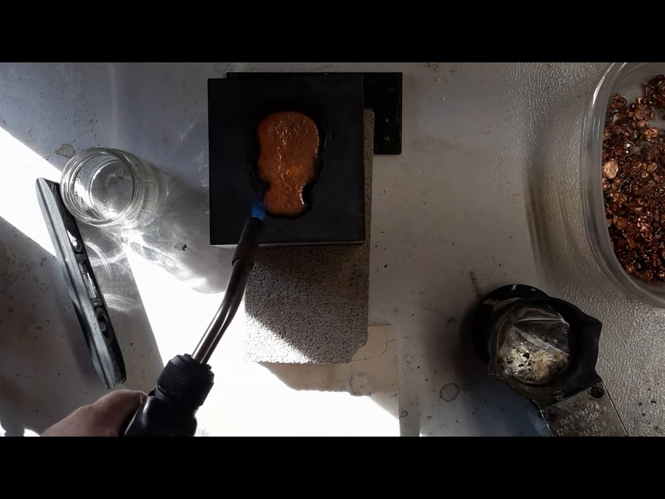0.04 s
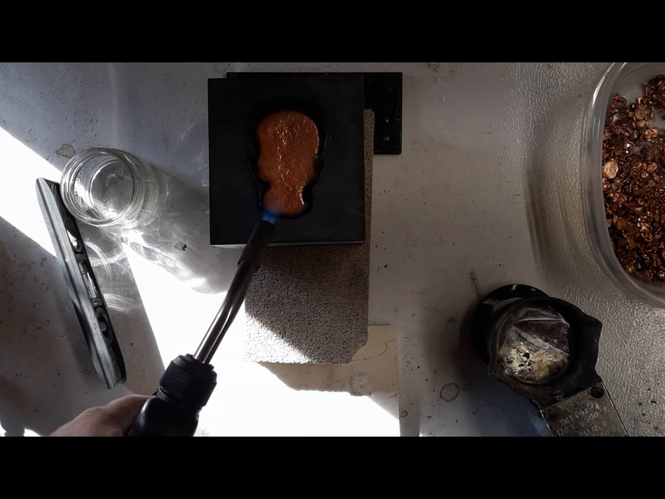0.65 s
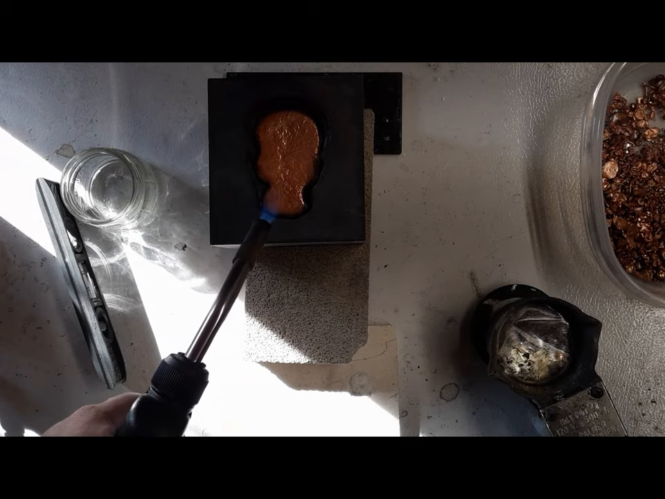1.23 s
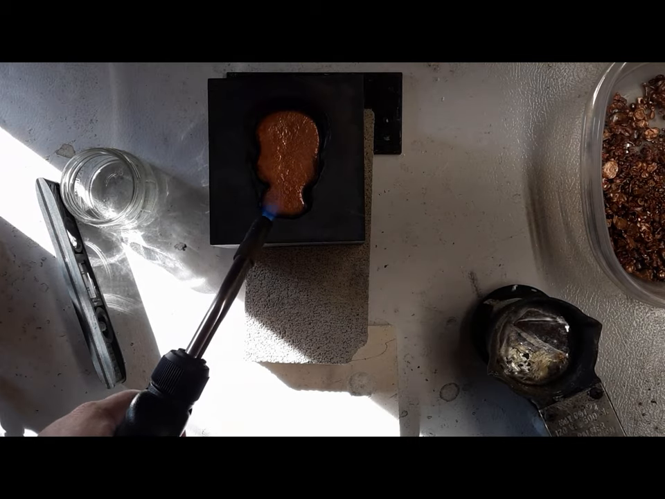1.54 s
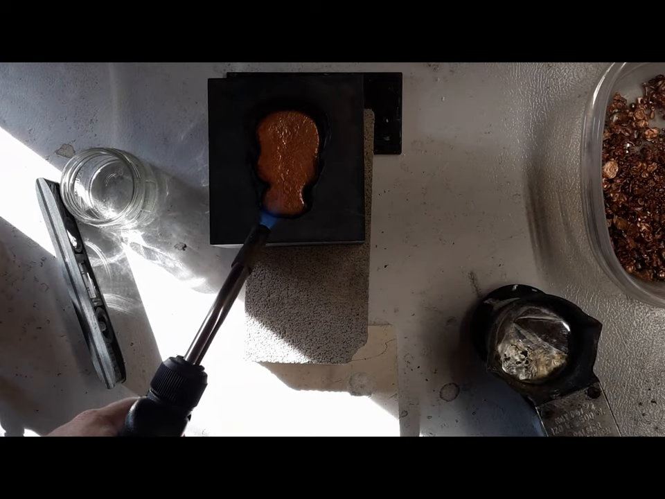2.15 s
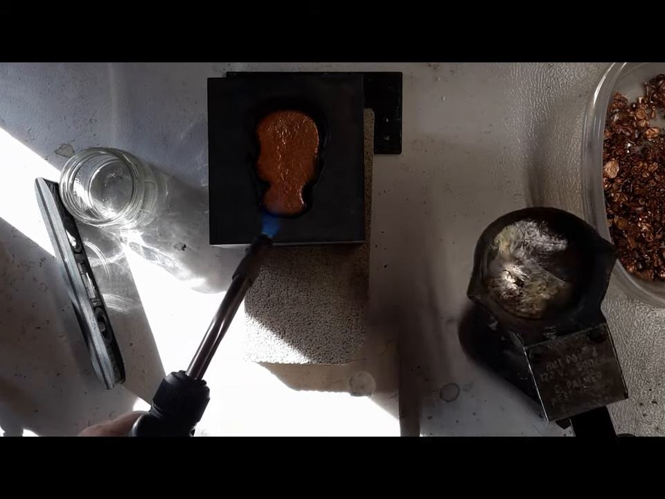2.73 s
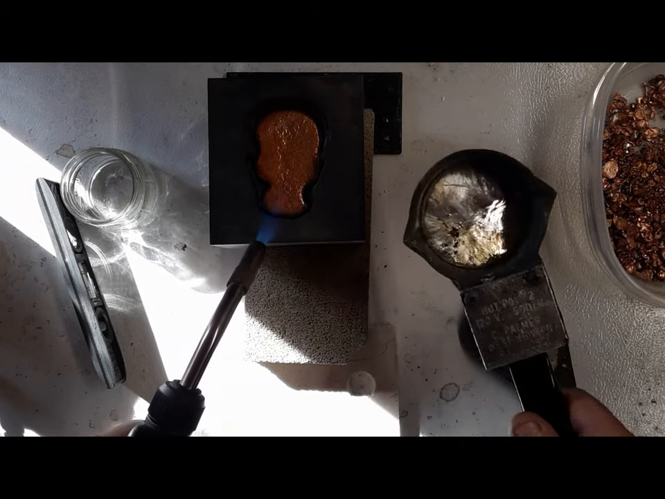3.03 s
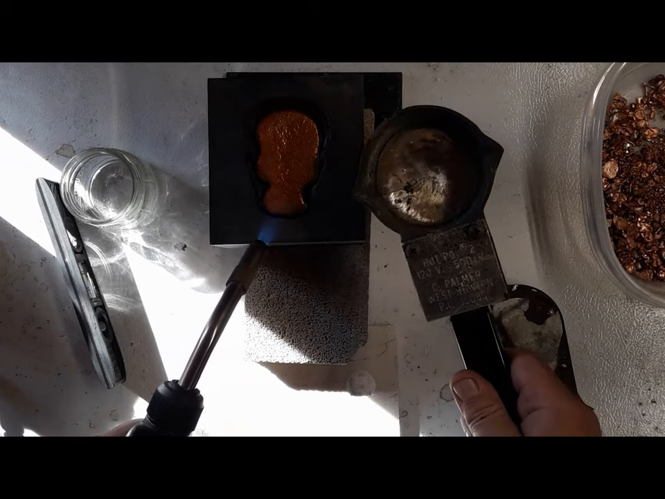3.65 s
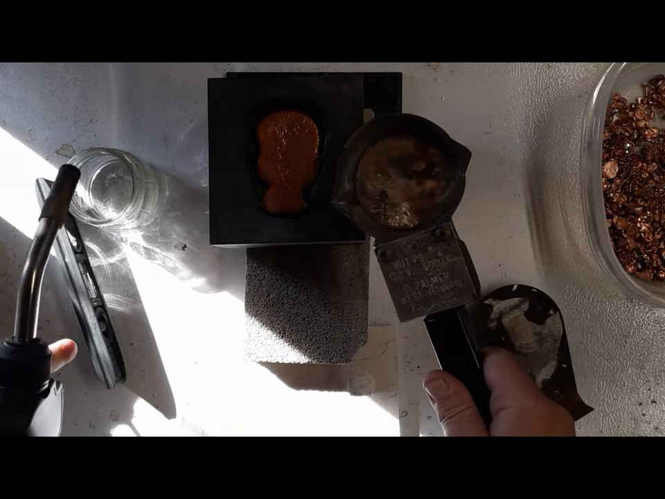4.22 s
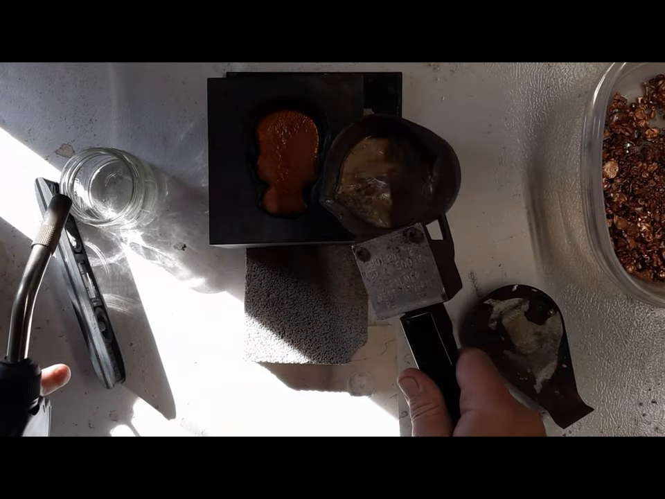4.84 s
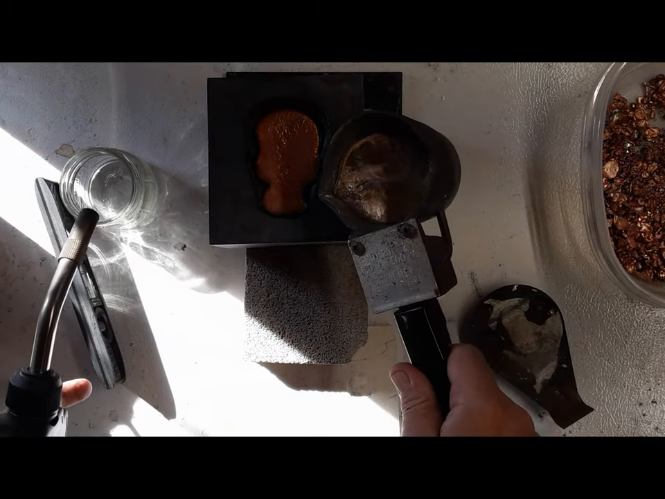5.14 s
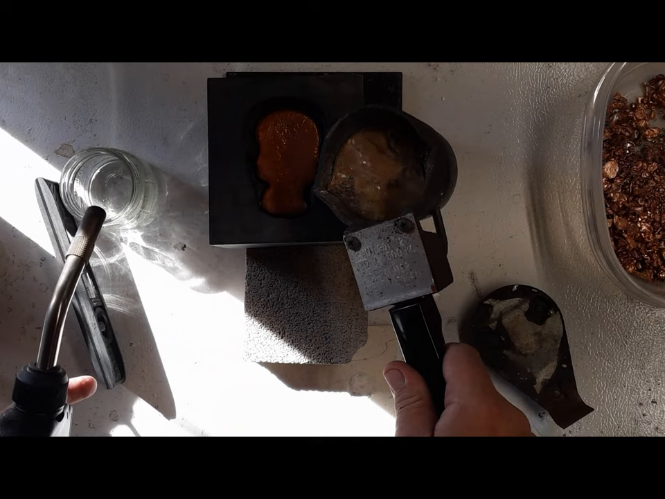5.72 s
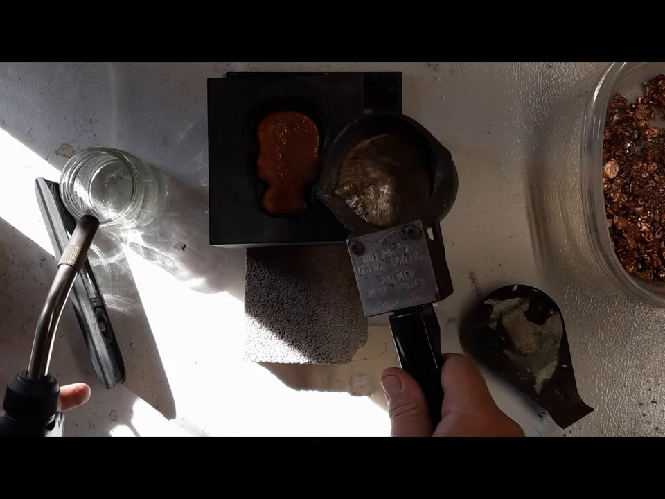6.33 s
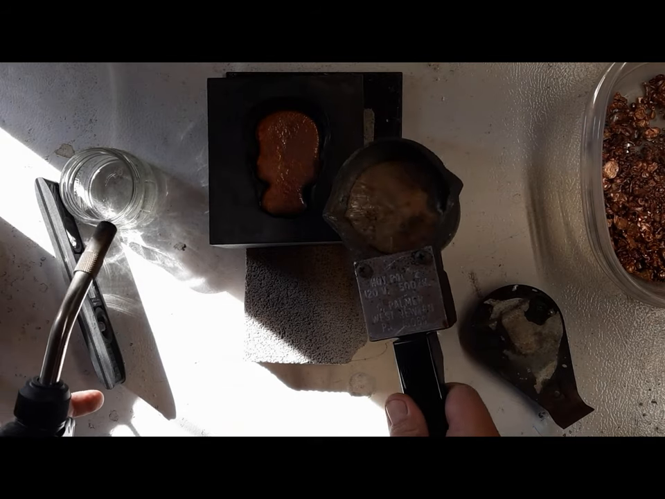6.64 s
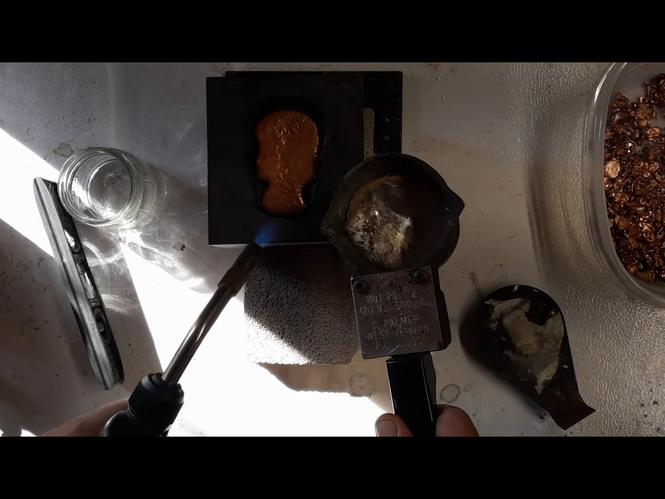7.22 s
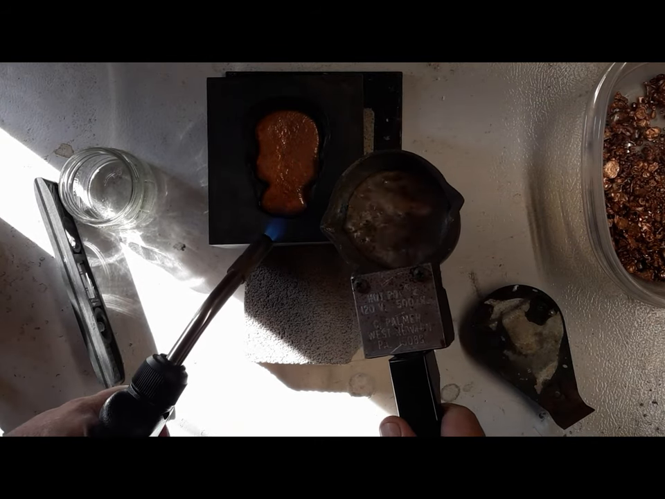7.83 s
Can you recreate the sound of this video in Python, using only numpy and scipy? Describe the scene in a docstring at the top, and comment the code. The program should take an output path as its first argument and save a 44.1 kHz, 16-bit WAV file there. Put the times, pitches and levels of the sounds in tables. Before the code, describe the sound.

Close to the microphone at a workbench, a gas torch flame gives a low roar with a raspy hiss on top. It cuts off after four seconds. A quiet pause holds only soft room noise, a faint hum and slight tool ticks. Then comes a short rush of gas and a sharp metallic igniter click, and the hissing flame returns with a small puff.

```python
"""At a workbench, a hand-held gas torch burns over a mould, is shut off, and is relit three seconds later.
Turbulence makes the flame roar and the gas jet hiss; reflections from the bench and the things on it
colour both by interference. In the pause a machine hums, air moves and handled tools click. Then the
trigger lets cold gas out, the piezo igniter snaps, and the flame catches with a low puff."""
import sys
import numpy as np
from scipy import signal
from scipy.fft import rfft, irfft
from scipy.io import wavfile

SR = 44100
rng = np.random.default_rng(int(sys.argv[2]) if len(sys.argv) > 2 else 0)


def transcribe(u):
    """Save the signal u as a 16-bit wav file named by the first command-line argument.

    u: samples, shape (n,) or (channels, n), limited to [-1, 1]; the rate is SR.
    q: integer samples, one column per channel.
    """
    v = np.clip(np.atleast_2d(u).T, -1, 1)
    q = np.round(v * 32767).astype(np.int16)
    wavfile.write(sys.argv[1], SR, q)


N = 356310
T = np.arange(N) / SR
SHUT_S, GAS_S, LIT_S = 4.052, 7.11, 7.1985  # valve shuts, valve opens, spark
FRAME_SIZE = 4096
HZ = np.fft.rfftfreq(FRAME_SIZE, 1 / SR)
FRAME_S = np.arange(N * 4 // FRAME_SIZE + 3) * FRAME_SIZE / 4 / SR


def gain_of(db):
    """Amplitude ratio of a level in decibels."""
    return 10 ** (np.asarray(db) / 20)


def unit_rms(x):
    """A signal normalised to rms 1."""
    return x / np.sqrt(np.mean(x ** 2) + 1e-20)


def curve(points):
    """Interpolation of (frequency, value) points on a log-frequency axis."""
    hz, value = np.transpose(points)
    return np.interp(np.log(HZ + 1), np.log(hz + 1), value)


def bumps(modes, at=HZ):
    """Resonances and antiresonances as Gaussian peaks and dips, in dB."""
    return sum(db * np.exp(-.5 * ((at - hz) / width) ** 2) for hz, width, db in modes)


def bell(hz, octaves):
    """A Gaussian passband on a log-frequency axis."""
    return np.exp(-.5 * (np.log2((HZ + 1) / hz) / octaves) ** 2)


def sides(left_db):
    """Gain of each ear for an interaural level difference, left minus right."""
    return gain_of(np.array([.5, -.5])[:, None, None] * left_db)


def swell(peak_s, width_s):
    """A Gaussian envelope that peaks at 1."""
    return np.exp(-.5 * ((T - peak_s) / width_s) ** 2)


def rising(start_s, rise_s):
    """0 until the start, then an exponential approach to 1."""
    return 1 - np.exp(-np.maximum(T - start_s, 0) / rise_s)


def dying(start_s, t60):
    """1 until the start, then an exponential decay of 60 dB in t60 seconds."""
    return np.exp(-np.log(1000) * np.maximum(T - start_s, 0) / t60)


def wander(lo_hz, hi_hz):
    """Random motion of rms 1, roughly pink between two rates."""
    hz = np.fft.rfftfreq(N, 1 / SR)
    pink = rfft(rng.standard_normal(N)) * (hz > lo_hz) / np.sqrt(hz + lo_hz)
    return unit_rms(irfft(pink / (1 + (hz / hi_hz) ** 2), N))


def noise(magnitude, coherence, lag_s=0):
    """Stereo noise of rms 1 with a given spectral shape, interaural coherence and right-ear lag."""
    a, b, c, d = rng.standard_normal((4, len(FRAME_S), len(HZ)))
    left, independent = a + 1j * b, c + 1j * d
    right = coherence * left * np.exp(-2j * np.pi * HZ * lag_s)
    right += np.sqrt(1 - coherence ** 2) * independent
    spectra = (np.array([left, right]) * magnitude).swapaxes(1, 2)
    _, wave = signal.istft(spectra, nperseg=FRAME_SIZE, noverlap=FRAME_SIZE * 3 // 4)
    return unit_rms(wave[:, :N])


def band(x, lo_hz, hi_hz):
    """A steep band-pass filter with its output at rms 1."""
    hz = np.fft.rfftfreq(N, 1 / SR)
    attenuation = np.sqrt((1 + (lo_hz / (hz + 1)) ** 20) * (1 + (hz / hi_hz) ** 20))
    return unit_rms(irfft(rfft(x) / attenuation, N))


def torch(roar_db=-25.5, jet_db=-33):
    """Turbulence radiates broadband noise: a low roar, a rasp and a jet hiss that fluctuate together."""
    # spectrum of the flame: frequency_hz, density_db
    spectrum = [(20, -58), (70, -32.5), (130, -13), (220, 2.5), (500, -14), (900, -3.5), (1400, -10),
                (2250, -15), (2550, -21), (5800, -21), (7600, -28.5), (10800, -31), (11900, -36.5),
                (15500, -36)]
    # resonances of the burner head: centre_hz, width_hz, gain_db
    burner_modes = [(159, 5.4, 3.5), (3670, 81, 3), (4720, 96, 2.5), (5850, 52, 3.5), (6910, 74, 2.5),
                    (7300, 100, -1.5), (11040, 130, 2.5)]
    # stereo balance of the flame: frequency_hz, left_minus_right_db
    balance = [(60, -0.5), (110, 0.5), (200, -4), (380, -2), (700, -0.5), (1290, -1), (2380, 0.5),
               (4400, -0.5), (8120, -1), (15000, -3.5)]
    # likeness of the flame at the two ears: frequency_hz, coherence
    coherence = [(60, 1), (130, 1), (290, 0.99), (640, 0.85), (1410, 0.8), (3100, 0.54), (6820, 0.45),
                 (15000, 0.088)]
    # the rasp as the flame plays over the mould: time_s, level_db
    rasp_levels = [(0.2, -26.5), (0.82, -28), (1.08, -26), (1.45, -29), (1.88, -26.3), (2.5, -27),
                   (3.2, -29), (3.75, -29.5), (3.97, -31.5)]
    colour = gain_of(curve(spectrum) + bumps(burner_modes) + nearby_objects())
    turbulence = noise(colour * bench() * sides(curve(balance)), curve(coherence))
    flutter, throb = wander(8.3, 150), wander(4.0, 24)
    flare_db = flaring()
    gasp = swell(4.05, 0.018)  # a last rasp as the valve closes
    rasp_db = np.interp(T, *np.transpose(rasp_levels))
    roar = band(turbulence, 22, 1113) * burning(roar_db, -29, overshoot_db=5.5, settle_s=0.24, t60=0.18)
    roar *= gain_of(flare_db + 0.15 * flutter + 0.64 * throb)
    rasp = band(turbulence, 1245, 3040)
    rasp *= burning(rasp_db, -30, overshoot_db=5.5, settle_s=0.082, t60=0.19)
    rasp *= gain_of(0.32 * flare_db + 4 * gasp + 0.15 * flutter + 0.76 * throb)
    jet = band(turbulence, 3220, 16500) * burning(jet_db, -37, overshoot_db=6, settle_s=0.21, t60=0.18)
    jet *= gain_of(0.14 * flare_db + gasp + 0.46 * flutter + 0.38 * throb)
    return roar + rasp + jet


def burning(first_db, relit_db, overshoot_db, settle_s, t60, catch_s=0.029):
    """Combustion envelope: the flame starves once shut off; relit, it overshoots and relaxes."""
    second_db = relit_db + overshoot_db * np.exp(-np.maximum(T - LIT_S, 0) / settle_s)
    alight = np.where(T < LIT_S, dying(SHUT_S, t60), rising(LIT_S, catch_s))
    return alight * gain_of(np.where(T < GAS_S, first_db, second_db))


def bench(dull_hz=9000, sway_s=1.2e-5, clutter=0.11, clutter_hz=2800, clutter_sway_s=3e-5, count=16):
    """Comb filtering: reflections interfere with the direct sound, and the combs slide as the hand sways."""
    # near reflections: delay_s, left_gain, right_gain
    echoes = [(0.0004, 0.34, 0.15), (0.00132, -0.36, 0.028), (0.00277, 0.06, 0.24), (0.00352, 0.39, 0.25),
              (0.00579, 0.05, 0.13), (0.00758, 0.1, 0.16)]
    # standing waves and cancellations over the bench: centre_hz, width_hz, gain_db
    bench_modes = [(77, 15, 8.5), (190.4, 7.6, -14), (247.7, 28, -9), (294.2, 5.5, 8), (338.6, 20.7, -9),
                   (376, 7.4, 6.5), (448, 12, -16), (524, 28.6, 7), (567, 7.8, -19), (640, 28, 5),
                   (763, 21, 5.5), (847, 16, 1.5), (933, 6.8, 4), (1022, 8.3, -11.5), (1046, 5.4, 3.5),
                   (1095, 13, -7.5), (1157, 6.6, -2), (1206, 16, -9.5), (1276, 13, -9), (1430, 18, -5),
                   (1533, 18, 4), (1584, 14, 6), (1830, 5.6, 5.5), (1950, 9.5, -11), (2073, 9, 4),
                   (3320, 53, -6), (4020, 39, -3.5), (4990, 34, -6), (5230, 69, -4.5)]
    hand = np.interp(FRAME_S, T, wander(.1, 0.62))[:, None]
    paths = np.ones((2, len(FRAME_S), len(HZ)), complex)  # ear, frame, frequency
    slide = np.exp(-2j * np.pi * HZ * sway_s * hand - HZ / dull_hz)
    for delay_s, left, right in echoes:
        paths += np.array([left, right])[:, None, None] * np.exp(-2j * np.pi * HZ * delay_s) * slide
    # small things scatter only short waves; the flame nears some and leaves others
    short_waves = HZ ** 2 / (HZ ** 2 + clutter_hz ** 2)
    for direction in (-1, 0, 1):
        delays_s = np.geomspace(.0014, .016, count)[:, None] * rng.uniform(.9, 1.1, (count, 1))
        ear_delays_s = delays_s + rng.uniform(-3e-5, 3e-5, (2, count, 1))
        polarity = rng.choice([-1, 1], (count, 1))
        scatter = (polarity * np.exp(-2j * np.pi * HZ * ear_delays_s)).sum(1)[:, None]
        motion = np.exp(-2j * np.pi * HZ * direction * clutter_sway_s * hand)
        paths += clutter * short_waves * scatter * motion
    return abs(paths) * gain_of(bumps(bench_modes))


def nearby_objects(ladle_s=(2.4, 3.3), swing_s=(3.67, 3.84), octaves_per_s=0.78, echo_s=0.0021):
    """Resonance and reflection near the flame colour it, in dB per frame and frequency."""
    # two resonances of the jet grazing the mould's edge: time_s, upper_db, lower_db
    jet_song = [(0, -1, -1), (.3, -4, 1.5), (.55, 1.5, 3), (.87, -0.5, -0.5), (1.15, 1, 0),
                (1.48, 5.5, -1.5), (1.9, -2.5, 2.5), (2.199, -1.5, -1.5), (2.55, -2.5, 1.5), (3.1, 2.5, -3)]
    # peaks and dips over the mould alone: centre_hz, width_hz, gain_db
    mould_modes = [(2315, 86, 3.5), (2580, 110, -6.5), (3030, 96, 4.5)]
    # peaks and dips with a ladle alongside: centre_hz, width_hz, gain_db
    ladle_modes = [(300, 16, 3), (916, 16, 4.5), (1800, 110, -4), (3900, 270, 2), (7300, 920, -2.5)]
    # a dip as the ladle passes closest: centre_hz, width_hz, gain_db
    ladle_hollow = [(3200, 260, -3.5)]
    # peaks and dips that slide down as the torch swings away: centre_hz, width_hz, gain_db
    swing_modes = [(1940, 220, -6), (2950, 89, -0.5), (3620, 190, 4.5), (4280, 220, 5.5), (5630, 160, 2),
                   (6880, 1000, -2.5)]
    # the second burn, held lower at the mould's edge: centre_hz, width_hz, gain_db
    low_hold_modes = [(225, 27, -1.5), (301, 14, 0.5), (659, 30, 0), (810, 31, -1.5), (1050, 15, 3),
                      (1102, 11, -1), (1260, 12, -4), (1290, 14, 9), (1360, 32, -1), (1840, 120, -2),
                      (2270, 55, 5), (2500, 39, -12), (3150, 95, 4), (3530, 51, -1), (4050, 60, -4),
                      (4530, 110, -6), (4850, 60, 3.5), (5080, 70, -4), (5380, 60, 3.5), (5750, 110, -7),
                      (8250, 130, 3)]
    t = FRAME_S[:, None]
    beside, away = np.interp(t, ladle_s, (0, 1)), np.interp(t, swing_s, (0, 1))
    times, upper_db, lower_db = np.transpose(jet_song)
    song = np.interp(t, times, upper_db) * bell(4530, 0.16)
    song += np.interp(t, times, lower_db) * bell(3110, 0.07)
    pipe = 0.56 * np.interp(t, T, flaring()) * bell(865, 0.09)  # flares drive a pipe-like resonance
    hollow = np.interp(t, T, swell(2.98, 0.2)) * bumps(ladle_hollow)
    surroundings = (1 - beside) * bumps(mould_modes) + beside * bumps(ladle_modes) + hollow
    sliding_hz = HZ * 2 ** (octaves_per_s * (t - swing_s[1]))
    comb = 0.5 * np.cos(2 * np.pi * sliding_hz * echo_s)  # a bench reflection lengthens with the swing
    swing = bumps(swing_modes, sliding_hz) + comb
    first_burn = (1 - away) * (song + pipe + surroundings) + away * swing
    return np.where(t < GAS_S, first_burn, bumps(low_hold_modes))


def flaring():
    """Amplitude modulation of the flame by brief flares and lulls, in dB."""
    # flares and lulls of the roar: peak_s, gain_db, width_s
    flares = [(0.191, 5, 0.01), (0.765, -3, 0.018), (1.23, 2, 0.26), (1.92, 1.5, 0.058),
              (2.957, 1.5, 0.044), (3.19, -2.5, 0.042), (3.305, 3, 0.025), (3.42, -1.5, 0.039),
              (3.608, 1.5, 0.085), (3.985, -2, 0.013), (4.032, 5.5, 0.0064), (7.265, 2.5, 0.015),
              (7.336, -3.5, 0.01)]
    return sum(db * swell(peak_s, width_s) for peak_s, db, width_s in flares)


def workshop(air_db=-51, waver_db=1.7, sizzle_rest_db=-81):
    """Ambient noise: moving air, machine tones modulated in level and phase, and a faint high sizzle."""
    # spectrum of the moving air: frequency_hz, density_db
    air_spectrum = [(20, -38), (45, -22), (65, -14), (105, -1), (180, -10), (240, -5.5), (620, -8.5),
                    (780, -11.5), (1800, -15), (3100, -24.5), (4500, -26), (8000, -35.5), (12000, -43.5),
                    (15500, -41)]
    # likeness of the air at the two ears: frequency_hz, coherence
    air_coherence = [(60, 0.81), (290, 0.98), (640, 0.84), (1400, 0.25), (3100, 0.11), (8000, 0.11)]
    # partials of the machine hum: pitch_hz, level_db, phase_drift_rad
    partials = [(60.4, -71.5, .8), (91.3, -63.5, 0.96), (106.8, -59, 1.1), (219, -62, 2.1), (645, -72, 2.2),
                (933, -75, 2.5)]
    # three swells of the sizzle in the pause: peak_s, level_db, width_s
    sizzle_swells = [(4.4, -64, 0.21), (5.62, -72, 0.05), (6.52, -68.5, 0.21)]
    # spectrum of the sizzle: frequency_hz, density_db
    sizzle_spectrum = [(2000, -16), (4200, 5), (6500, -5), (11000, -6), (12500, -12), (15500, -15)]
    # the right ear lags, so the air is heard from the left
    air = gain_of(air_db) * noise(gain_of(curve(air_spectrum)), curve(air_coherence), lag_s=0.00034)
    hum = np.zeros(N)
    for hz, db, drift_rad in partials:
        amplitude = np.sqrt(2) * gain_of(db + waver_db * wander(0.41, 2.4))
        hum += amplitude * np.sin(2 * np.pi * hz * T + drift_rad * wander(0.56, 8.7))
    swells = sum(gain_of(db) * swell(peak_s, width_s) for peak_s, db, width_s in sizzle_swells)
    sizzle = (gain_of(sizzle_rest_db) + swells) * noise(gain_of(curve(sizzle_spectrum)), coherence=0.18)
    return air + hum + sizzle


def knocks(room_db=-5, contact_t60=0.023):
    """Light impacts on metal and trigger: each is a short click followed by reverberation."""
    # knocks of the handled tools: start_s, level_db, centre_hz, width_octaves, room_t60_s
    touches = [(5.011, -59, 7800, .35, .12), (5.021, -64, 6000, .6, .14), (6.941, -55, 2200, 0.8, .12),
               (6.95, -56, 2200, 0.8, .1), (7.053, -50, 2600, 0.92, 0.22), (7.086, -62, 4000, 0.81, .12)]
    out = np.zeros((2, N))
    for start_s, db, hz, octaves, room_t60 in touches:
        fade = dying(start_s, contact_t60) + gain_of(room_db) * dying(start_s, room_t60)
        out += gain_of(db) * noise(bell(hz, octaves), coherence=.4) * rising(start_s, .0004) * fade
    return out


def unlit_gas(level_db=-44, open_s=0.013, surge_db=3.0):
    """Jet noise: cold gas hisses from the open valve and excites the burner tube until it catches."""
    # spectrum of gas leaving the nozzle: frequency_hz, density_db
    spectrum = [(290, -46), (500, -16), (1040, -3), (1530, -16), (2200, -5), (2650, -18), (3010, -4),
                (3630, -8), (4570, -2), (5130, -9), (5750, 0), (7240, -11), (10200, -6), (14200, -14),
                (15500, -28)]
    # resonances of cold gas in the tube: centre_hz, width_hz, gain_db
    tube_modes = [(1080, 50, 4), (2200, 40, 4), (3120, 50, -1), (4520, 60, 9), (5530, 60, 7), (6520, 70, 9),
                  (8150, 100, 4), (10000, 150, 5), (12900, 130, 5)]
    rush_db = level_db + surge_db * dying(GAS_S + 0.035, t60=0.41)  # the first rush is the strongest
    hiss = noise(gain_of(curve(spectrum) + bumps(tube_modes)), coherence=.35)
    return gain_of(rush_db) * hiss * rising(GAS_S, open_s) * dying(LIT_S, t60=0.105)


def igniter(spark_db=-19, crack_db=-15, echo_db=-22, room_db=-22, ring_db=-24):
    """Impulse excitation: a spring hammer hits the piezo, giving a spark, an echoing crack and a ring."""
    # spectrum of the snap: frequency_hz, density_db
    spectrum = [(40, -50), (100, -33), (280, 6), (520, -48), (1050, 0.5), (2400, -4.5), (3500, 1),
                (4300, -4.5), (5800, -4.5), (8000, -11), (10300, -5.5), (12000, -16), (15500, -14)]
    # modes of the torch tube: pitch_hz, relative_level_db, t60_s
    tube_modes = [(3500, 12.5, 0.14), (3584, 9, 0.087), (3540, -4, 0.11), (4330, -2, .14),
                  (5860, -1.5, 0.09)]
    crack_t60, echo_s = 0.094, .0076
    balance = sides(left_db=-2)
    spark = gain_of(spark_db) * noise(bell(11500, 0.5) * balance, coherence=0) * dying(LIT_S, t60=0.035)
    crack = gain_of(crack_db) * dying(LIT_S, crack_t60)
    echo = gain_of(echo_db) * rising(LIT_S + echo_s, 0.00026) * dying(LIT_S + echo_s, crack_t60 / 2)
    room = gain_of(room_db) * rising(LIT_S, 0.0029) * dying(LIT_S, t60=0.33)
    envelope = np.sqrt(crack ** 2 + echo ** 2 + room ** 2)  # incoherent sounds add in power
    snap = noise(gain_of(curve(spectrum)) * balance, coherence=0.31) * envelope
    ring = sum(gain_of(db) * dying(LIT_S, t60) * np.sin(2 * np.pi * (hz * T + rng.random((2, 1))))
               for hz, db, t60 in tube_modes)
    return rising(LIT_S, .0002) * (spark + snap + gain_of(ring_db) * ring)


def ignition_pop(puff_db=-22, puff_hz=270, flare_db=-27, flare_hz=1080):
    """Sudden combustion: gas gathered at the nozzle burns in a low puff; the flame flares and settles."""
    puff = noise(bell(puff_hz, 0.28), coherence=0.77) * rising(LIT_S, 0.0016) * dying(LIT_S, t60=0.082)
    flare = noise(bell(flare_hz, 0.17), coherence=0.33) * rising(LIT_S, 0.063) * dying(LIT_S, t60=1.3)
    return gain_of(puff_db) * puff + gain_of(flare_db) * flare


def scene():
    """Superposition of all the sources."""
    return torch() + workshop() + knocks() + unlit_gas() + igniter() + ignition_pop()


def record(dry):
    """Band limiting: a linear-phase low-pass filter removes the highest treble."""
    low_pass = signal.firwin(511, cutoff=15750, window=("kaiser", 9), fs=SR)
    return signal.oaconvolve(dry, low_pass[None], "same")


dry = scene()
out = record(dry)
transcribe(out)
```